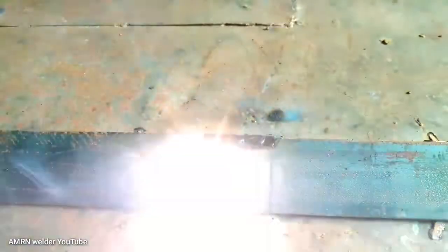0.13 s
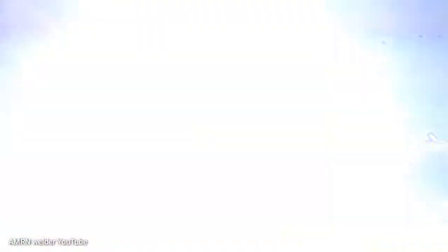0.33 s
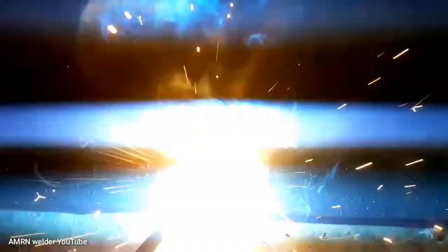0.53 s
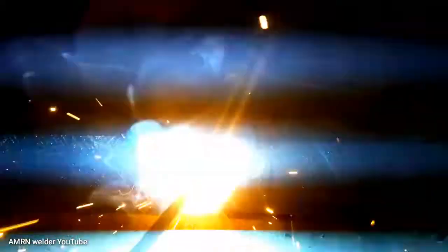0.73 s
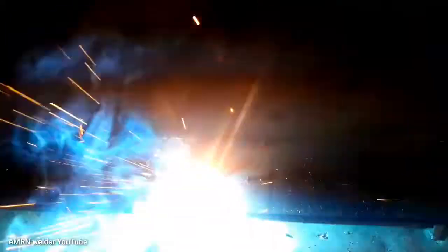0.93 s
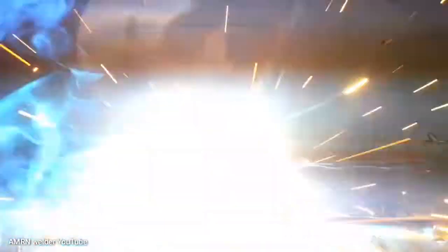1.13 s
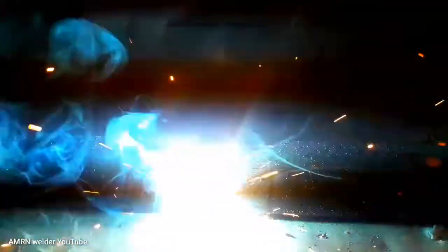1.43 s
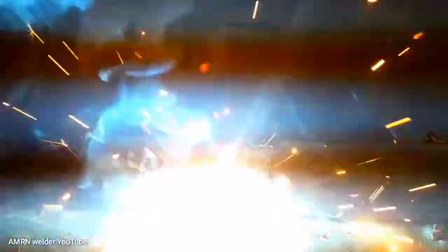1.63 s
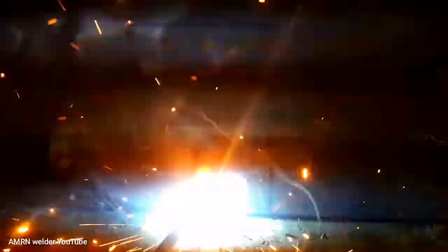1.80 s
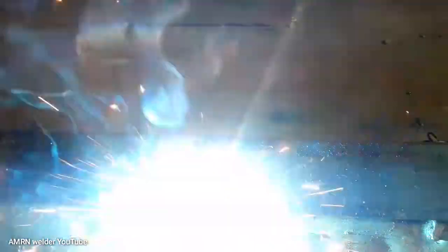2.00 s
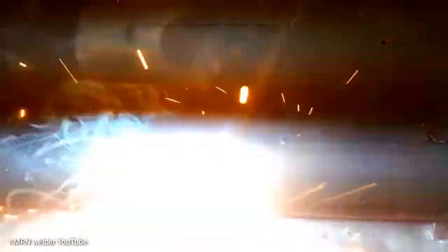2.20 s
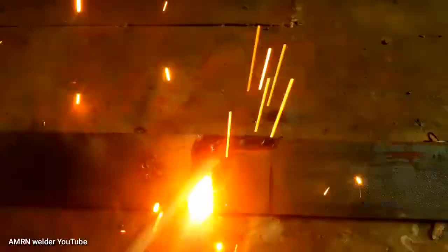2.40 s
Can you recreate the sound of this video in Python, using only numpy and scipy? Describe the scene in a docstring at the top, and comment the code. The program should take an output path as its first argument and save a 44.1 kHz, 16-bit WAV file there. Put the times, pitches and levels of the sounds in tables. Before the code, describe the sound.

A stick welding arc strikes on steel, sizzling and crackling harshly, then breaks off into fading fizz

```python
"""A low workshop hum; at 0.2 s a stick welding arc strikes on steel close to a phone microphone.
Its sizzle, noise and spits, swells twice each mains cycle over a sine buzz; a faint tone wavers.
Droplets short the arc, dipping the sizzle, then break with cracks of snap and noise spray; the arc column
swells or collapses in pressure steps that the microphone's low cut turns into thuds.
At 2.32 s the arc breaks: the room rings on and the slag fizzes, fading."""
import sys
import numpy as np
from scipy import signal
from scipy.fft import rfft, irfft, next_fast_len
from scipy.io import wavfile
from scipy.ndimage import uniform_filter1d, map_coordinates

SR = 44100
rng = np.random.default_rng(int(sys.argv[2]) if len(sys.argv) > 2 else 0)


def to_wav(s):
    """Save 16-bit WAV."""
    ch = np.atleast_2d(s).T  # columns
    pcm = np.round(np.clip(ch, -1, 1) * 32767)  # PCM
    wavfile.write(sys.argv[1], SR, pcm.astype(np.int16))


N = 112454
TIME_S = np.arange(N) / SR

ARC_ON_S, ARC_OFF_S, ARC_EDGE_S = .201, 2.321, .003
RIPPLE_HZ, RIPPLE_PEAK_S = 101.8, .0088
BODY_HZ = 2460  # body below, treble above

# Droplets breaking. Each row: time in seconds, level in dB, weight in dB of the body under BODY_HZ.
DROPLETS = [(0.213, -28.5, 16.5), (0.233, -25.5, 16), (0.3213, -12.5, -5), (0.3514, -14, 1),
            (0.3743, -18.5, 0), (0.3883, -14, 3.5), (0.3919, -16, 7), (0.4033, -11.5, -4), (0.4228, -17, 1),
            (0.4323, -6, -11), (0.449, -7.5, 7), (0.4699, -10, 4.5), (0.483, -23, 7), (0.4997, -12, 1),
            (0.528, -17.5, 7.5), (0.5385, -23, -2), (0.579, -18, 6), (0.5973, -10.5, 1.5), (0.609, -8, 4.5),
            (0.6254, -15, -6), (0.656, -14.5, 4.5), (0.669, -19, 17.5), (0.685, -17, -4),
            (0.7348, -10.5, -21), (0.7433, -13, -5), (0.763, -10, 4), (0.7849, -18, 7),
            (0.8217, -6.5, -3.5), (0.8426, -13.5, -1), (0.8468, -10.5, -16), (0.8659, -13, -10),
            (0.9224, -19.5, -1), (0.9783, -14.5, 6), (0.9988, -12, -8), (1.009, -15, -23),
            (1.0494, -6, -14), (1.068, -12.5, -8), (1.0707, -11.5, -3), (1.079, -10, -21), (1.137, -8, -15),
            (1.175, -7.5, -1), (1.1786, -11.5, 0), (1.246, -14, -19), (1.3131, -12, 4.5),
            (1.3418, -11, 3.5), (1.375, -11.5, -0.5), (1.3919, -8.5, -7.5), (1.4317, -6.5, -26),
            (1.4414, -13.5, -18), (1.4737, -8, -27), (1.4911, -17.5, 2), (1.5481, -10, -22),
            (1.569, -11, -34.5), (1.667, -8.5, 4), (1.6865, -6, -5), (1.7273, -8, 0), (1.7472, -9, -2),
            (1.7843, -7, -11), (1.8055, -7.5, -13), (1.8966, -6.5, -14), (1.9134, -13, -5.5),
            (1.946, -10, -19), (1.9633, -10.5, -28), (1.9814, -13.5, -16), (2.1187, -22, 6),
            (2.1383, -7, 7.5), (2.1755, -9, 5.5), (2.1785, -14.5, 1), (2.228, -17, -7), (2.2757, -14, 7),
            (2.2787, -14.5, -5)]


def amp(db):
    """Amplitude factor of a level in dB."""
    return 10 ** (np.asarray(db) / 20)


def unit(x):
    """x scaled to an rms of 1."""
    return x / np.sqrt(np.mean(x ** 2) + 1e-20)


def along(points, hz):
    """(Hz, value) points interpolated on a log frequency axis."""
    point_hz, values = np.transpose(points)
    return np.interp(np.log(hz + 1), np.log(point_hz + 1), values)


def wobble(knots_per_s, shift_knots=0):
    """A smooth random curve through normal draws."""
    knots = rng.standard_normal(int(N * knots_per_s / SR) + 4)
    return map_coordinates(knots, [np.arange(N) * knots_per_s / SR + shift_knots])


def coloured(x, spectrum):
    """x through a minimum-phase filter with this (Hz, dB) spectrum; white noise keeps its level."""
    size = 2048
    cepstrum = irfft(np.log(amp(along(spectrum, np.fft.rfftfreq(size, 1 / SR)))))
    # folding the cepstrum makes the filter causal
    cepstrum[1:size // 2] *= 2
    cepstrum[size // 2 + 1:] = 0
    pulse = irfft(np.exp(rfft(cepstrum)))
    return signal.fftconvolve(x, pulse / np.linalg.norm(pulse))[:N]


def dying(starts, t60_s):
    """An envelope that jumps at each start and falls 60 dB in t60_s."""
    return signal.lfilter([1], [1, -amp(-60 / (t60_s * SR))], starts)


def weighted(body, treble):
    """The part of one signal under BODY_HZ joined to the part of another above it."""
    low_pass = signal.butter(2, BODY_HZ, "low", fs=SR, output="sos")
    high_pass = signal.butter(2, BODY_HZ, "high", fs=SR, output="sos")
    # the two halves are in antiphase, so subtracting joins them
    return signal.sosfilt(low_pass, body) - signal.sosfilt(high_pass, treble)


def sizzle():
    """Hiss and tiny spits swell with the ripple of the current; each swell has its own strength."""
    # Each row: time in seconds, hiss level in dB, weight in dB of its body under BODY_HZ.
    arc_course = [(0.2, -55, 0), (0.215, -48, 16), (0.25, -44.5, 11), (0.28, -37, -0.5), (0.42, -31.5, 3.5),
                  (0.55, -32, 2), (0.68, -35, -3.5), (0.8, -41.5, 1), (0.93, -41.5, 1), (1.05, -34, -4.5),
                  (1.18, -40.5, 3), (1.3, -39.5, 3), (1.43, -41, 0), (1.55, -36, 1.5), (1.68, -38.5, -2),
                  (1.8, -43.5, 0.5), (1.93, -37, 2), (2.1, -34, 0.5), (2.148, -31.5, 4), (2.18, -38.5, 4),
                  (2.32, -40.5, 7)]
    # Each row: frequency in Hz, level in dB per Hz.
    sizzle_colour = [(150, -10.5), (400, -2), (1900, 0.5), (15400, -0.5)]
    ripple_depth_db, cycle_scatter_db, flutter_db = 9, 1.5, 3  # ripple depth: peak to trough
    spits_per_s, spit_db, spit_spread_db, spit_t60_s = 1300, -1.5, 3.2, .00015

    cycles = RIPPLE_HZ * (TIME_S - RIPPLE_PEAK_S)
    ripple_db = ripple_depth_db / 2 * np.cos(2 * np.pi * cycles)
    # one knot at each ripple peak
    scatter_db = cycle_scatter_db * wobble(RIPPLE_HZ, shift_knots=1 - RIPPLE_HZ * RIPPLE_PEAK_S)
    swell = amp(ripple_db + scatter_db + flutter_db * wobble(900))
    hiss = unit(swell * rng.standard_normal(N))

    spit_now = rng.random(N) < spits_per_s / SR
    spit_sizes = amp(spit_spread_db * np.minimum(rng.exponential(size=N), 3))
    spit_envelope = dying(spit_now * spit_sizes * swell, spit_t60_s)
    spits = unit(spit_envelope * rng.standard_normal(N))

    time_s, level_db, body_db = np.transpose(arc_course)
    level = burning() * shorted() * amp(np.interp(TIME_S, time_s, level_db))
    noise = level * (hiss + amp(spit_db) * spits)
    body = amp(np.interp(TIME_S, time_s, body_db)) * noise
    return coloured(weighted(body, noise), sizzle_colour)


def burning():
    """1 while the arc burns, 0 otherwise, with short linear edges."""
    return np.clip(np.minimum(TIME_S - ARC_ON_S, ARC_OFF_S - TIME_S) / ARC_EDGE_S, 0, 1)


def shorted():
    """Gain of the sizzle: it sinks while a droplet bridges the gap, further before a louder crack."""
    short_s, dip_db_per_db, dip_from_db = .006, .5, -24
    dip_db = np.zeros(N)
    for time_s, level_db, _ in DROPLETS:
        bridged = slice(round((time_s - short_s) * SR), round(time_s * SR))
        dip_db[bridged] = -dip_db_per_db * max(level_db - dip_from_db, 0)
    return amp(uniform_filter1d(dip_db, size=30))


def cracks():
    """Each droplet breaks with a snap and a short spray of noise; some have more body than others."""
    # Each row: frequency in Hz, level in dB per Hz.
    crack_colour = [(150, -33), (400, -4.5), (1000, -0.5), (3000, -1.5), (15400, 2)]
    snap_db, snap_t60_s = 7, .0003
    spray_db, spray_t60_s, spray_wobble_db = -8, .012, 4.9

    starts = np.zeros((2, N))  # body, treble
    for time_s, level_db, body_db in DROPLETS:
        starts[:, round(time_s * SR)] = amp(level_db + np.array([body_db, 0]))
    snap = -amp(snap_db) * dying(starts, snap_t60_s)
    spray_level = amp(spray_db + spray_wobble_db * wobble(2000))
    spray = dying(starts, spray_t60_s) * spray_level * rng.standard_normal(N)
    body, treble = snap + spray
    return coloured(weighted(body, treble), crack_colour)


def steps():
    """As the arc column swells or collapses, the pressure jumps, then relaxes slowly."""
    # Each row: time in seconds, size before the low cut (+ swell, - collapse), rise in ms.
    pressure_jumps = [(0.3406, 0.1, 0.04), (0.3411, -0.13, 0.04), (0.3737, -0.36, 0.15),
                      (0.4322, -0.16, 0.04), (0.4327, 0.12, 0.04), (0.4696, -0.74, 0.04),
                      (0.5974, -0.24, 0.04), (0.5979, 0.13, 0.04), (0.6089, -0.18, 0.04),
                      (0.6096, 0.45, 0.04), (0.6682, 0.65, 0.04), (0.6689, -0.9, 0.04),
                      (0.7631, -0.09, 0.04), (0.8216, 0.68, 0.08), (0.9786, -0.1, 0.04),
                      (1.0001, -0.74, 0.08), (1.0496, 0.25, 0.04), (1.0714, -0.16, 0.04),
                      (1.0798, -0.19, 0.04), (1.1368, 0.1, 0.3), (1.176, 0.21, 0.15), (1.3134, -0.4, 0.04),
                      (1.342, 0.32, 0.04), (1.3769, -0.15, 0.04), (1.392, 0.12, 0.04),
                      (1.4318, -0.27, 0.04), (1.4406, 0.64, 0.04), (1.4737, -0.85, 0.08),
                      (1.492, -0.13, 0.04), (1.5476, 0.3, 0.08), (1.5699, 0.4, 0.15), (1.6663, 0.33, 0.04),
                      (1.6674, -0.78, 0.5), (1.6868, 0.45, 0.04), (1.7473, -0.18, 0.04),
                      (1.7843, 0.27, 0.3), (1.8056, -0.41, 0.04), (1.8078, -0.68, 0.04),
                      (1.8961, 0.25, 0.3), (1.9643, 0.3, 0.15), (2.1385, -0.23, 0.04), (2.1388, 0.2, 0.04),
                      (2.1754, -0.16, 0.04), (2.2792, -0.19, 0.15)]
    relax_s = .1  # time constant
    out = np.zeros(N + SR)
    since_s = np.arange(SR) / SR
    for time_s, size, rise_ms in pressure_jumps:
        rise_s = rise_ms * 0.0013  # time constant, 1.3 times the tabled rise
        jump = np.exp(-since_s / relax_s) - np.exp(-since_s / rise_s)
        out[round(time_s * SR):][:SR] += size * jump
    return out[:N]


def fizz():
    """The hot slag hisses on, fading, once the arc has broken."""
    start_db, fall_db_per_s, wobble_db = -60.5, 36, 2.2
    since_s = TIME_S - ARC_OFF_S
    level = amp(start_db - fall_db_per_s * since_s + wobble_db * wobble(89))
    return (since_s > 0) * level * rng.standard_normal(N)


def bench(arc_noise):
    """Plate and bench colour all the arc's noise."""
    # Each row: frequency in Hz, level in dB.
    bench_colour = [(300, 6), (1100, -0.5), (1330, 5), (1550, -4), (1790, 4), (2239, -2), (2720, 4),
                    (3500, -1), (4823, 4.0), (5340, 0), (5684, 1), (7000, 6), (8000, 1), (8957, -2.5),
                    (9991, -2), (10508, 4), (11025, -1), (11714, 7), (12230, -2.5), (12919, 1), (13436, 4),
                    (13781, -4.5), (15159, 4.5), (15400, 3.5)]
    return coloured(arc_noise, bench_colour)


def buzz():
    """The arc column pulses at the ripple rate: sines of wandering level."""
    # Each row: multiple of the ripple rate, peak level in dB before its wander.
    ripple_lines = [(1, -51.5), (2, -57)]
    lines = 0
    for multiple, level_db in ripple_lines:
        level = amp(level_db + 3.9 * wobble(7.1))
        lines = lines + level * np.sin(2 * np.pi * multiple * RIPPLE_HZ * TIME_S)
    return burning() * lines


def tone():
    """One faint partial, unsteady in pitch and level, perhaps the molten pool."""
    # Each row: time in seconds, pitch in Hz and peak level in dB, both before their wander.
    tone_course = [(.24, 522, -58), (.34, 517, -46), (0.451, 492, -51), (.8, 464, -55), (1.36, 443, -52.5),
                   (1.44, 635.6, -53.5), (1.848, 607, -50.5), (2.07, 583, -48), (2.13, 491, -59),
                   (2.23, 450, -45), (2.31, 500, -45.5), (2.4, 471, -55), (2.55, 470, -65)]
    time_s, hz, level_db = np.transpose(tone_course)
    pitch_hz = np.interp(TIME_S, time_s, hz) * (1 + .014 * wobble(40))
    level = amp(np.interp(TIME_S, time_s, level_db, left=-120) + 2.1 * wobble(24.76))
    return level * np.sin(2 * np.pi * np.cumsum(pitch_hz) / SR)


def room(x):
    """Each frequency of the room's answer dies at its own speed; every stretch gets its own tail."""
    # Each row: frequency in Hz, time to fall 60 dB in seconds.
    room_t60 = [(150, .3), (480, 1), (900, 0.44), (3000, 0.26), (12000, 0.16)]
    # Each row: frequency in Hz, level in dB.
    room_colour = [(150, -6), (480, 1), (900, 4.5), (3000, 2.5), (12000, 0)]
    room_db = -16.5
    stretch, delay = SR // 5, 200  # samples
    out = np.zeros(N + SR)
    for start in range(0, N, stretch):
        hz, t_s, noise = signal.stft(rng.standard_normal(SR // 2), SR, nperseg=256)
        tail_db = along(room_colour, hz)[:, None] - 60 * t_s / along(room_t60, hz)[:, None]
        tail = signal.istft(noise * amp(tail_db), SR, nperseg=256)[1]
        wet = signal.fftconvolve(x[start:start + stretch], tail / np.linalg.norm(tail))
        out[start + delay:][:len(wet)] += wet
    return amp(room_db) * out[:N]


def hum():
    """The low murmur of the workshop: coloured noise of slightly wandering level."""
    # Each row: frequency in Hz, level in dB per Hz.
    hum_colour = [(24, -18.5), (54, 6), (95, -8), (182, -13), (221, -17.5), (680, -20.5), (1100, -28.5),
                  (2200, -26.5), (3500, -39), (15400, -52)]
    hum_db, wander_db = -51.5, 1.3
    return amp(hum_db + wander_db * wobble(9.3)) * coloured(rng.standard_normal(N), hum_colour)


def scene():
    """The arc's noise and its room answer, with thuds, buzz, tone and hum added dry."""
    arc = bench(sizzle() + cracks() + fizz())
    return (arc + room(arc) + steps() + buzz() + tone() + hum())[None]


def record(dry):
    """The microphone's third-order low cut; then a steep drop above 15.45 kHz and silence above top_hz."""
    # Each row: frequency in Hz, gain in dB.
    top_treble = [(15450, 0), (15550, -22), (15900, -30), (16800, -36)]
    low_cut_hz, top_hz = 116.4, 16800
    low_cut = signal.butter(3, low_cut_hz, "high", fs=SR, output="sos")
    x = signal.sosfilt(low_cut, dry)
    size = next_fast_len(N + 4096)
    hz = np.fft.rfftfreq(size, 1 / SR)
    gain = amp(along(top_treble, hz)) * (hz < top_hz)
    return irfft(rfft(x, size) * gain, size)[:, :N]


dry = scene()
out = record(dry)
to_wav(out)
```